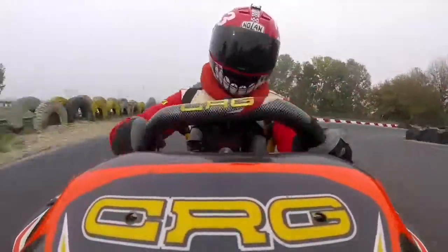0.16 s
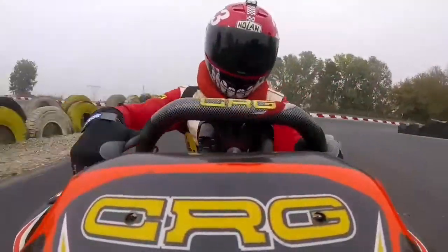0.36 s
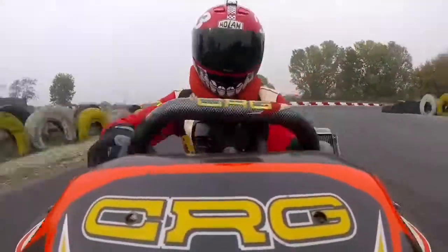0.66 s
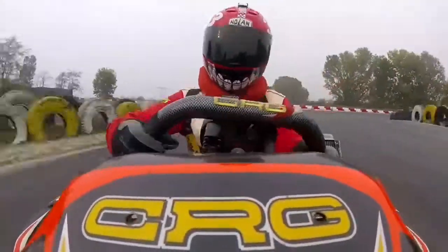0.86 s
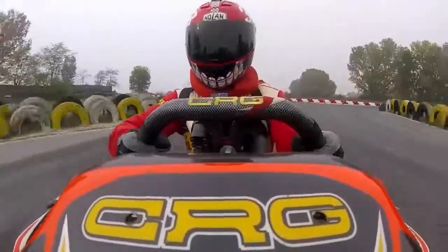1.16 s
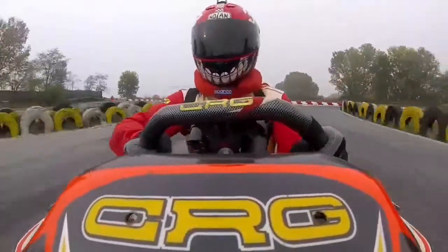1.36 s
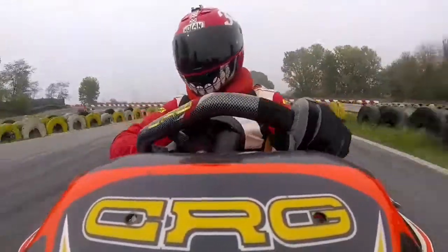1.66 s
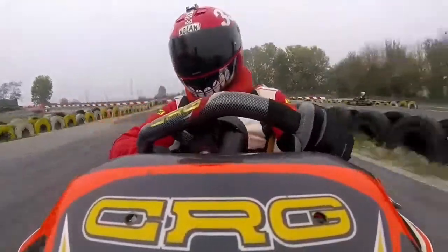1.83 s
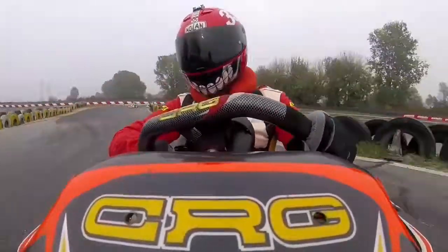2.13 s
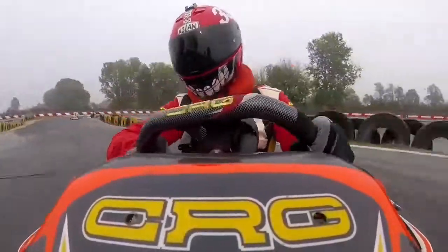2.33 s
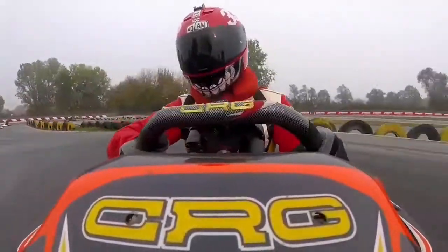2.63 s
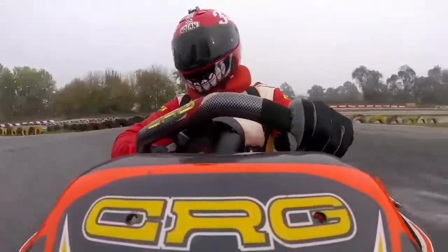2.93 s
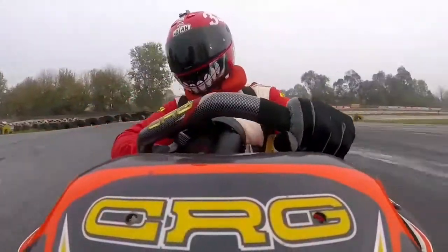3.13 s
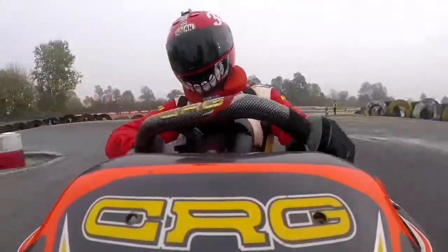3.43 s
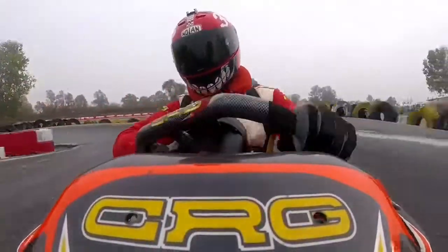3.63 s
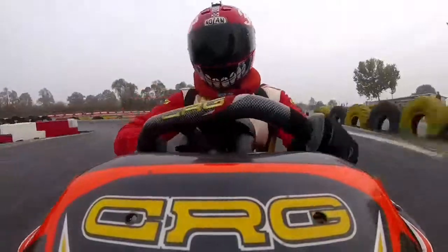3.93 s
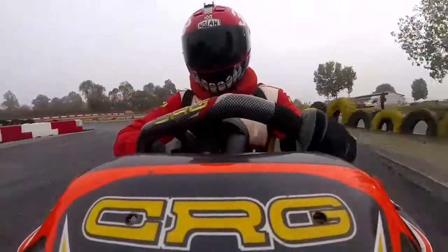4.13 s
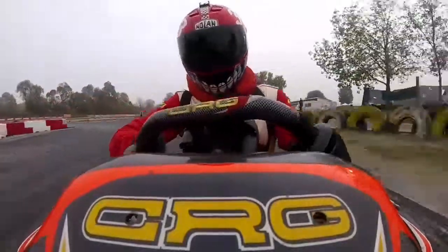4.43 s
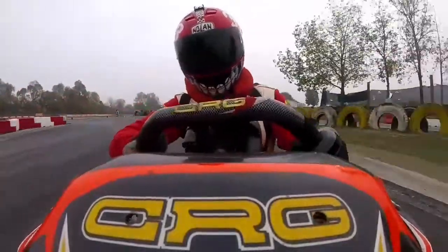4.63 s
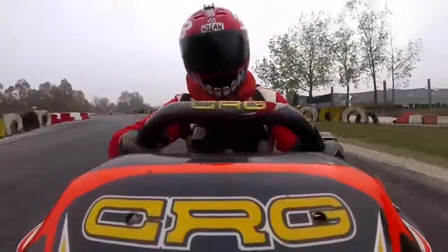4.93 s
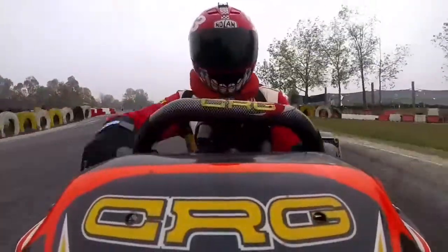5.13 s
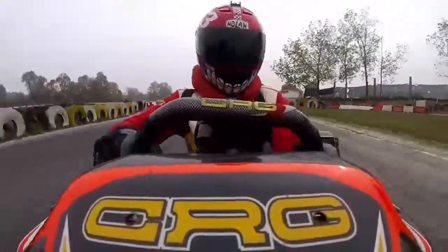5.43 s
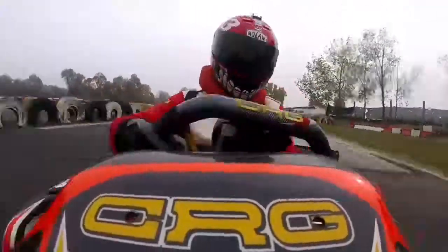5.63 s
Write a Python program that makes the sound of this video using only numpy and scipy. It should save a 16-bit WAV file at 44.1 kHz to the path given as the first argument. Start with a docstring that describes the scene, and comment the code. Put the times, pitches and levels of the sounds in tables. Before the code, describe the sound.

A two-stroke racing kart buzzes along, drops off the throttle, labours through a slow corner and pulls away, its plastic fairing knocking and rumbling.

```python
"""A two-stroke racing kart on a circuit, heard from a microphone on its own nose fairing.
The engine is built from harmonics of its firing rate, which boom, ring in the pipe and rasp in its shell,
and from noise puffed at each firing. It lifts off, labours through a slow corner and pulls away.
Decaying modes knock and hum in the plastic bodywork, resonances and filtered noise make the fairing drone,
and shaped noise gives the wind rumble and tyre hiss underneath."""
import sys
import numpy as np
from scipy import signal
from scipy.fft import rfft, irfft, next_fast_len
from scipy.io import wavfile
from scipy.ndimage import uniform_filter1d, minimum_filter1d

SR = 44100
rng = np.random.default_rng(int(sys.argv[2]) if len(sys.argv) > 2 else 0)


def log_audio(samples):
    """Write samples as a 16-bit WAV file to the path given in sys.argv[1]."""
    # one column per channel
    frames = np.atleast_2d(samples).T
    # limit to full scale, then quantise
    limited = np.clip(frames, -1, 1)
    pcm = np.round(limited * 32767).astype(np.int16)
    wavfile.write(sys.argv[1], SR, pcm)


N = 254883
T = np.arange(N) / SR  # time of every sample in seconds

# How rough the ride is at the fairing, before each layer's trim.
# Each row: time in seconds, rumble of wind and bumps in dB, road and panel roar in dB.
RIDE_LEVELS = [(0, -23.5, -24), (.25, -24.5, -20.5), (.6, -16.5, -28), (.86, -28, -28.5), (1.3, -24, -24.5),
               (1.7, -28, -28.5), (2.07, -35, -30), (2.25, -18, -26.5), (2.6, -26.5, -29.5),
               (3.05, -25, -25.5), (3.6, -22, -25), (4.3, -21.5, -24.5), (4.6, -30.5, -28),
               (4.97, -30.5, -26.5), (5.3, -20, -25), (5.45, -23, -27), (5.7, -19, -23)]


def amp(db):
    """Decibels to gain."""
    return 10 ** (np.asarray(db) / 20)


def evened(x):
    """Scales to rms 1."""
    return x / np.sqrt(np.mean(x ** 2) + 1e-20)


def steadied(x, size=4000):
    """Holds the running rms near 1, over a window given in samples."""
    power = uniform_filter1d(uniform_filter1d(x ** 2, size), size)
    return x / np.sqrt(abs(power) + 1e-12)


def curve(rows, axis=1):
    """One column of a table, joined by straight lines, at every sample."""
    rows = np.array(rows)
    return np.interp(T, rows[:, 0], rows[:, axis])


def read(points, hz):
    """Gain of a spectrum at the given frequencies, straight in dB over log frequency."""
    point_hz, db = np.transpose(points)
    return amp(np.interp(np.log(hz + 1), np.log(point_hz), db, left=-90, right=-90))


def colour(x, points):
    """Filters a sound by a spectrum."""
    size = next_fast_len(N + 4096)
    gain = read(points, np.fft.rfftfreq(size, 1 / SR))
    return irfft(rfft(x, size) * gain, size)[:N]


def wander(hz):
    """Smooth chance of rms 1 that changes up to hz times a second."""
    knots = signal.resample_poly(rng.standard_normal(2400), 8, 1)
    return evened(np.interp(T * hz * 16, np.arange(len(knots)), knots))


def bell(s, half_s):
    """Smooth hump of height 1 around time s."""
    return np.exp(-((T - s) / half_s) ** 2)


def add(mix, s, sound):
    """Lays a sound into the mix at time s."""
    part = mix[max(round(s * SR), 0):][:len(sound)]
    part += sound[:len(part)]


def revs(hunt_hz=.15):
    """Firing rate in Hz: its course, the dying swings of the drive chain and a slight unsteadiness."""
    # Engine speed. Each row: time in seconds, firings per second in Hz.
    rev_course = [(0, 240.6), (.1, 246), (.34, 239.3), (.46, 245.1), (.57, 183.7), (.64, 178.6), (.95, 204),
                  (1.26, 220), (1.3, 208.7), (1.82, 169.9), (1.98, 145), (2.3, 137), (2.42, 142.1),
                  (2.62, 134.6), (2.98, 135.6), (3.3, 144.7), (3.52, 145.9), (3.68, 142.4), (3.83, 145.5),
                  (3.92, 139.1), (4.42, 154.1), (4.85, 174.2), (5.26, 209.4), (5.33, 183.7), (5.46, 180.1),
                  (5.6, 187.8), (5.78, 190)]
    # The chain snatches and the revs swing about their course.
    # Each row: start in seconds, swing in Hz, swing rate in Hz, decay in seconds.
    chain_surges = [(0.571, 14.2, 7.9, .32), (4.596, 1.4, 7.6, 2.5), (5.333, 15, 6.5, 2.5)]
    hz = curve(rev_course) + hunt_hz * wander(12)
    for s, swing_hz, rate_hz, decay_s in chain_surges:
        age = np.maximum(T - s, 0)
        hz = hz - swing_hz * np.exp(-age / decay_s) * np.sin(2 * np.pi * rate_hz * age)
    return uniform_filter1d(hz, 400)


def throttle():
    """Throttle opening, 0-1."""
    # The driver's foot. Each row: time in seconds, opening 0-1.
    pedal_course = [(0, 0.69), (.42, 0.76), (.56, 0), (.61, .02), (.66, 0.52), (1.27, 0.83), (1.32, .1),
                    (2.28, 0.05), (2.5, .7), (2.62, 0.49), (3.5, 0.83), (4.05, .7), (4.5, 0.89),
                    (5.25, 0.96), (5.29, 0.01), (5.38, 0), (5.44, 0.73), (5.78, 0.68)]
    return np.clip(curve(pedal_course), 0, 1)


def overrun(bite=0.27):
    """1 while the engine coasts, towards 0 as it pulls; at an opening of bite it is down to 0.37."""
    return np.exp(-(throttle() / bite) ** 2)


def lugging(hz, lug_hz=147.8, range_hz=1.7):
    """Near 1 when the engine labours below lug_hz, near 0 once it runs freely; range_hz softens the step."""
    return .5 - .5 * np.tanh((hz - lug_hz) / (2 * range_hz))


def roughness(hz, when_open=0.034, when_shut=0.77, at_top=.14, at_lug=0.078, top_hz=242.4):
    """Raggedness, 0-1: firing is clean under throttle, ragged on the overrun, near top revs and when lugging."""
    by_throttle = when_open + (when_shut - when_open) * overrun()
    by_revs = at_top * (hz / top_hz) ** 16 + at_lug * lugging(hz)
    return np.clip(by_throttle + by_revs, .01, .97)


def voice(hz, pipe_db=-18.5, pipe_shut_db=-13, rasp_db=-25, rasp_shut_db=-21.5, rasp_lug_db=-1):
    """Base gains of pipe ring and shell rasp: full throttle, then changes for shut throttle and revs."""
    # The pipe rings most at low revs. Each row: firing rate in Hz, change in dB.
    ring_by_revs = [(125, 2), (145, 1), (156, 1), (163, -10.5), (169, -4), (180, -8), (210, -7.5),
                    (260, -0.5)]
    shut = 1 - throttle()
    ring = amp(pipe_db + pipe_shut_db * shut) * read(ring_by_revs, hz)
    rasp = amp(rasp_db + rasp_shut_db * shut + rasp_lug_db * lugging(hz))
    return ring, rasp


def throb(turns, lag=0, firings_per_throb=11.2):
    """Gain that dips once per turn of the rear axle, in spells that swell and fade; lag is in axle turns."""
    # Spells of throbbing. Each row: central dip in seconds, half length in seconds, depth 0-1.
    throb_spells = [(2.83, .3, .5), (3.532, 0.39, 0.68), (3.861, 0.12, .6), (4.179, 0.16, 0.96),
                    (4.486, 0.21, 0.6)]
    gain = np.ones(N)
    for s, half_s, depth in throb_spells:
        axle = (turns - np.interp(s, T, turns)) / firings_per_throb - lag
        gain = gain * (1 - min(depth, 1) * bell(s, half_s) * np.cos(2 * np.pi * axle))
    return gain


def air(turns, wind_db=2.0, hiss_db=3.0, pulsing=0.05, flicker_db=0.92):
    """Wind and bumps rumble at the microphone; tyre and engine hiss swells slightly with each firing."""
    # Rumble at the microphone. Each row: frequency in Hz, relative level in dB.
    wind_spectrum = [(10, -28.5), (26, -21), (42, 0.5), (55, -9.5), (82, 3.5), (110, -2.5), (160, -1),
                     (240, -7), (500, -45)]
    # Tyre and engine hiss. Each row: frequency in Hz, relative level in dB.
    hiss_spectrum = [(1500, 2.5), (3000, -2), (4000, -10), (4600, -6), (4950, -1.5), (5250, -2), (5800, -2),
                     (6600, -5.5), (7600, -9.5), (8500, -17.5), (9500, -23.5)]
    # Strength of the hiss before its trim. Each row: time in seconds, level in dB.
    hiss_course = [(0.0, -37.5), (0.51, -38.5), (0.55, -46), (1.26, -41), (1.32, -45.5), (1.9, -50),
                   (2.54, -44), (2.66, -47), (3.09, -37.5), (3.12, -40), (3.54, -37), (3.7, -39.5),
                   (5.1, -44.5), (5.25, -40.5), (5.33, -52), (5.42, -42), (5.75, -44), (5.78, -39)]
    wind = steadied(colour(rng.standard_normal(N), wind_spectrum))
    pulse = (1 + pulsing * np.cos(2 * np.pi * turns)) * amp(flicker_db * wander(40))
    hiss = evened(colour(pulse * rng.standard_normal(N), hiss_spectrum))
    return amp(curve(RIDE_LEVELS, axis=1) + wind_db) * wind + amp(curve(hiss_course) + hiss_db) * hiss


def judder(rebound=0.82):
    """The unsprung frame bounces unevenly and rebounds between bounces, swelling and dying away."""
    # A bump at the turn-in. The row: start in seconds, length in seconds, mean rate in Hz, bounce level in dB.
    bump_judder = (2.17, .19, 41, -16.5)
    s, length, hz, level_db = bump_judder
    swell = np.sin(np.pi * np.clip((T - s) / length, 0, 1))
    phase = 2 * np.pi * np.cumsum(hz * (1 + 0.1583 * wander(30))) / SR
    bounce = np.sin(phase) + rebound * np.sin(2 * phase + wander(30))
    return amp(level_db) * swell * bounce


def chassis(turns, hz, shake_db=2.0, panel_db=3.0, road_db=0., panel_hz=470, width_hz=56,
            second_db=-10, third_db=-23, smear=0.74):
    """Asphalt shakes the fairing in uneven bursts; an engine harmonic that meets its resonance makes it sing."""
    # Drone of the fairing panel. Each row: frequency in Hz, relative level in dB.
    panel_spectrum = [(90, -51), (150, -4), (250, -8), (320, -6), (385, -1), (450, 5), (490, -1),
                      (550, -15.5), (800, -42.5)]
    # Roar of the road. Each row: frequency in Hz, relative level in dB.
    road_spectrum = [(130, -13), (250, -4.5), (550, -3.5), (780, 0.5), (950, -0.5), (1300, -6.5),
                     (2500, -40.5), (5000, -39.5)]
    shake = amp(shake_db * wander(35))
    sung = np.zeros(N)
    for k, db in ((2, second_db), (3, third_db)):
        line = np.sin(2 * np.pi * k * turns + smear * wander(25))
        sung += amp(db) * line / (1 + ((k * hz - panel_hz) / (.5 * width_hz)) ** 2)
    panel = steadied(shake * colour(rng.standard_normal(N), panel_spectrum))
    road = steadied(colour(shake * rng.standard_normal(N), road_spectrum))
    shaken = amp(curve(RIDE_LEVELS, axis=2)) * (amp(panel_db) * panel + amp(road_db) * road)
    return shaken + throttle() * throb(turns) * shake * sung


def buzz(turns, ring_hz=453, smear=1.0, flutter_db=-1.0):
    """The main mode of the fairing rings unsteadily in spells, throbbing with the axle."""
    # Spells when the fairing buzzes, some shaken, some set off by an engine harmonic.
    # Each row: centre in seconds, half length in seconds, level in dB before throb and flutter.
    buzz_spells = [(1.265, 0.042, -14.5), (2.26, 0.041, -25.5), (3.5, 0.21, -19), (4.054, 0.12, -19.5),
                   (4.291, 0.15, -17), (5.134, 0.062, -22), (5.578, 0.028, -13)]
    swell = sum(amp(db) * bell(s, half_s) for s, half_s, db in buzz_spells)
    ring = np.sqrt(2) * np.sin(2 * np.pi * ring_hz * T + smear * wander(25))
    return swell * np.sqrt(throb(turns)) * amp(flutter_db * wander(30)) * ring


def knocks(knock_db=0.5, crack_db=-20, crack_s=0.003, scatter=0.031):
    """The plastic bodywork cracks and rings briefly: short decaying modes and a snap of noise."""
    # Bumps knock the bodywork; the row at 0.225 s is instead a short hum near 450 Hz,
    # as the engine's second harmonic meets the panel resonance.
    # Each row: time in seconds, peak in dB before the trims, change of the modes below 550 Hz in dB.
    body_bursts = [(.034, -4.5, -15), (.15, -3.5, -6), (.225, -7.5, 21), (.355, -8, -23), (.511, -8.5, 2),
                   (.549, -10.5, 4), (.662, -13, 2), (.757, -7, 1.5), (.888, -9.5, 2), (.976, -13.5, -7),
                   (1.066, -12, 2), (1.279, -8, -3), (2.02, -16, 3), (2.188, -13, -1), (2.221, -12, -4),
                   (2.256, -6.5, -5), (2.31, -21, -7), (5.22, -11, -3), (5.253, -9.5, -6),
                   (5.289, -11.5, -5), (5.435, -11, 0), (5.565, -6, -5), (5.695, -10, -12)]
    # Modes of the bodywork. Each row: frequency in Hz before scatter, level in dB, 60 dB decay in seconds.
    body_modes = [(264, -4, 0.052), (378, 6, 0.0094), (454.7, 4, 0.19), (595, 2, 0.021), (693, -4, 0.11),
                  (839, 3, 0.032), (1005, 6.5, 0.039), (1123, 0.5, 0.045), (1186, -4, 0.044),
                  (1600, -24, 0.015), (2000, -2, 0.0072), (2700, -24, .015)]
    t, out = np.arange(4000) / SR, np.zeros(N)
    hz, db, t60 = np.transpose(body_modes)[:, :, None]
    band = signal.butter(4, [1500, 2900], "bandpass", fs=SR)
    for s, peak_db, thud_db in body_bursts:
        detune, phase = rng.standard_normal((2, len(body_modes), 1))
        decay = amp(db + thud_db * (hz < 550) - 60 * t / t60)
        modes = decay * np.sin(2 * np.pi * (hz * (1 + scatter * detune) * t + phase))
        ring = modes.sum(0) * (1 - np.exp(-t / 0.00023))  # soft onset
        crack = np.exp(-t / crack_s) * evened(signal.lfilter(*band, rng.standard_normal(len(t))))
        burst = amp(peak_db + knock_db) * ring / abs(ring).max() + amp(peak_db + crack_db) * crack
        add(out, s - .001, burst)
    return out


def spits(spit_s=0.022, low_hz=1500, high_hz=2250):
    """Short coughs of gas rasp in the steel shell."""
    # Short raspy spits from the exhaust. Each row: centre in seconds, level in dB.
    exhaust_spits = [(0.347, -29), (2.453, -30), (3.855, -27)]
    band = signal.butter(2, [low_hz, high_hz], "bandpass", fs=SR)
    swell = sum(amp(db) * bell(s, spit_s) for s, db in exhaust_spits)
    return swell * evened(signal.lfilter(*band, rng.standard_normal(N)))


def gas(turns, hz, puff=0.37, leak=0.44, uneven=0.13, pipe_db=1.5, rasp_db=3.5):
    """Each firing also lets out a puff of turbulent gas, decaying over puff firings; no two burn alike."""
    # Gas noise in the pipe. Each row: frequency in Hz, relative level in dB.
    pipe_spectrum = [(500, -30.5), (700, -13), (900, -2), (1020, 4), (1150, 0.5), (1270, -18), (1400, -24),
                     (1700, -54)]
    # Gas noise in the shell. Each row: frequency in Hz, relative level in dB.
    rasp_spectrum = [(1100, -38), (1300, -4), (1600, 1.5), (1850, -2), (2150, -0.5), (2350, -9.5),
                     (2680, -16), (2950, -18.5), (3300, -14), (4100, -17.5), (5200, -16.5), (8000, -35.5)]
    strength = (leak + np.exp(-(turns % 1) / puff)) * (1 + uneven * wander(70))
    puffs = strength * rng.standard_normal(N)
    pipe, shell = steadied(colour(puffs, pipe_spectrum)), steadied(colour(puffs, rasp_spectrum))
    ring, rasp = voice(hz)
    return np.sqrt(roughness(hz)) * (ring * amp(pipe_db) * pipe + rasp * amp(rasp_db) * shell)


def resonance(modes, grid_hz):
    """Response of a set of resonances, their powers summed, over a grid of frequencies."""
    power = sum(amp(db) ** 2 / (1 + ((grid_hz - f) / (.5 * width)) ** 2) ** 1.47 for f, width, db in modes)
    return np.sqrt(power)


def exhaust(turns, hz, waver_db=2.5, bright_db=31.5, pipe_db=-1.1, rasp_db=-2.5):
    """The harmonics of the firing rate swell and fade as they slide through the resonances of pipe and shell."""
    # Resonances of the exhaust pipe. Each row: frequency in Hz, width in Hz, relative level in dB.
    pipe_modes = [(560, 19, -6), (704, 50, -14), (787, 80, -10), (944, 78, -2), (1030, 32, 3.5),
                  (1100, 98, -3.5), (1135, 103, -3), (1271, 19, -6.5)]
    # Resonances of its thin steel shell. Each row: frequency in Hz, width in Hz, relative level in dB.
    shell_modes = [(1448, 60, -2), (1564, 130, 1), (1750, 85, -2), (1860, 180, -3.5), (2060, 110, -6.5),
                   (2170, 48, -6.5), (2510, 120, -12.5), (2642, 100, -8.5), (2810, 58, -15.5),
                   (2936, 90, -11), (3090, 83, -16), (3416, 130, -17), (3820, 290, -21.5), (4900, 190, -22),
                   (5500, 500, -25.5)]
    turns = turns + .008 * roughness(hz) * wander(45)  # ragged firing jitters
    grid_hz = np.arange(9500)
    pipe_gain, shell_gain = resonance(pipe_modes, grid_hz), resonance(shell_modes, grid_hz)
    # near top revs the blast is steeper and favours the upper resonances
    steep_db = bright_db * np.maximum(np.log2(hz / 195), 0)
    pipe, shell = np.zeros((2, N))
    for k in range(3, 37):
        line = amp(waver_db * wander(18)) * np.cos(2 * np.pi * (k * turns + rng.random()))
        tilt = np.clip(2 * np.log2(k * hz / 2000), -.6, .6)
        pipe += line * np.interp(k * hz, grid_hz, pipe_gain)
        shell += line * np.interp(k * hz, grid_hz, shell_gain) * amp(steep_db * tilt)
    ring, rasp = voice(hz)
    blast = ring * amp(pipe_db) * steadied(pipe) + rasp * amp(rasp_db) * steadied(shell)
    return np.sqrt(1 - roughness(hz)) * blast


def boom(turns, hz, flutter_db=1.23, octave_db=-22, octave_shut_db=-9, octave_fall_db=-10, second_db=3.5):
    """Two nearly pure harmonics; the first follows the airbox resonance, throbs, and weakens in listed dips."""
    # The boom peaks as the firing rate crosses the airbox resonance: pulling, then on the overrun.
    # Each row: firing rate in Hz, level in dB before throb, flutter and dips.
    boom_open = [(125, -15), (143, -22.5), (154, -15), (175, -11.5), (190, -9), (215, -18), (260, -30.5)]
    boom_shut = [(125, -16), (145, -28), (168, -11), (182, -8), (200, -9.5), (260, -32)]
    # The boom weakens briefly at these times. Each row: centre in seconds, half length in seconds, depth in dB.
    boom_dips = [(0.607, 0.017, 10), (0.644, .02, 25), (.755, 0.038, 12), (1.1, .025, 9), (2.554, .02, 24),
                 (3.071, .08, 11), (3.3, 0.072, 17), (3.65, 0.049, 13), (5.271, 0.024, 20),
                 (5.387, 0.032, 23), (5.6, 0.018, 14), (5.78, 0.05, 14.5)]
    coasting = overrun()
    airbox = coasting * read(boom_shut, hz) + (1 - coasting) * read(boom_open, hz)
    gain = airbox * throb(turns) * amp(flutter_db * wander(25))
    for s, dip_s, depth_db in boom_dips:
        gain = gain * (1 - (1 - amp(-depth_db)) * bell(s, dip_s))
    first = gain * np.cos(2 * np.pi * turns + .12 * wander(20))
    # the second harmonic weakens with a shut throttle and with rising revs (dB per octave)
    level_db = octave_db + octave_shut_db * (1 - throttle()) + octave_fall_db * np.log2(hz / hz.min())
    smear = (0.31 + roughness(hz)) * wander(30)
    second = amp(level_db + second_db * wander(14)) * np.sin(4 * np.pi * turns + smear)
    return np.sqrt(2) * (first + second)


def scene(sway_hz=1.76, sway_lag=.22):
    """One crankshaft drives engine, fairing and the pulsing of the hiss; lugging, it sways with each throb."""
    course = revs()
    sway = 1 - throb(np.cumsum(course) / SR, sway_lag)
    hz = course + sway_hz * lugging(course) * sway
    turns = np.cumsum(hz) / SR  # firings so far
    ride = air(turns) + judder() + chassis(turns, hz) + buzz(turns) + knocks()
    engine = spits() + gas(turns, hz) + exhaust(turns, hz) + boom(turns, hz)
    return (ride + engine)[None]


def record(dry, ceiling=.87, edge_hz=9350):
    """A quick limiter holds the peaks down and the ends are faded; then the treble is cut above edge_hz."""
    room = ceiling / np.maximum(abs(dry), ceiling)
    limiter = uniform_filter1d(minimum_filter1d(room, size=300), size=300)
    held = dry * limiter * signal.windows.tukey(N, .0006)
    lowpass = signal.firwin(255, edge_hz, window=("kaiser", 9), fs=SR)
    return signal.oaconvolve(held, lowpass[None], "same")


dry = scene()
out = record(dry)
log_audio(out)
```